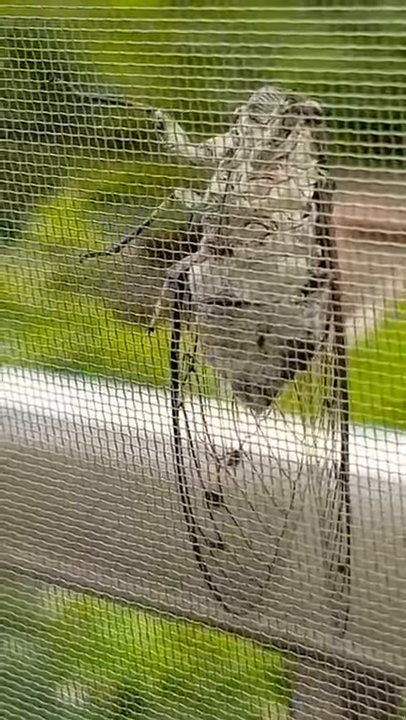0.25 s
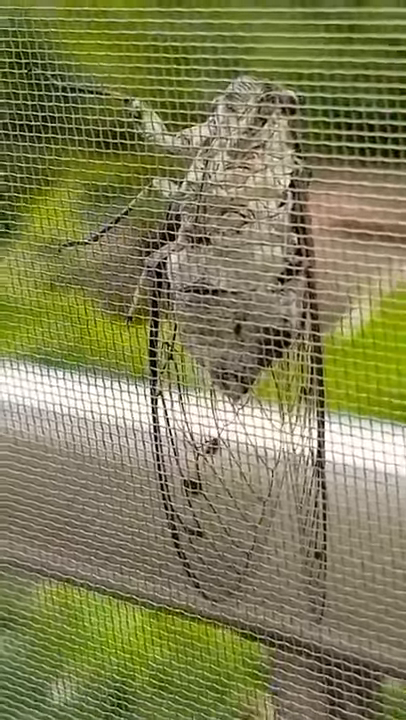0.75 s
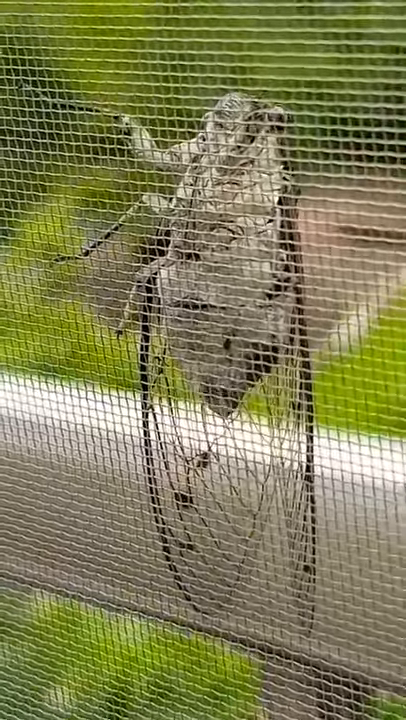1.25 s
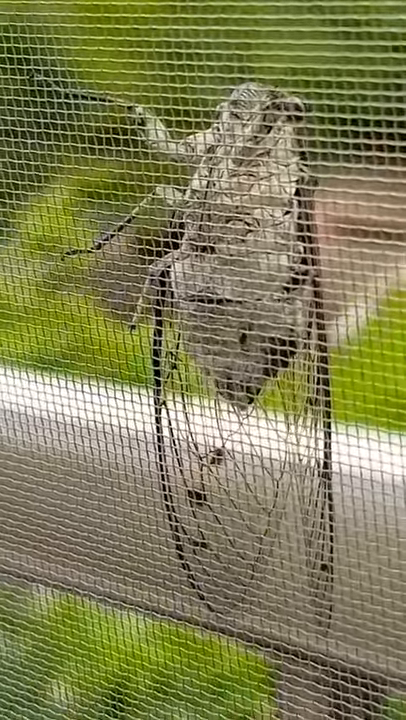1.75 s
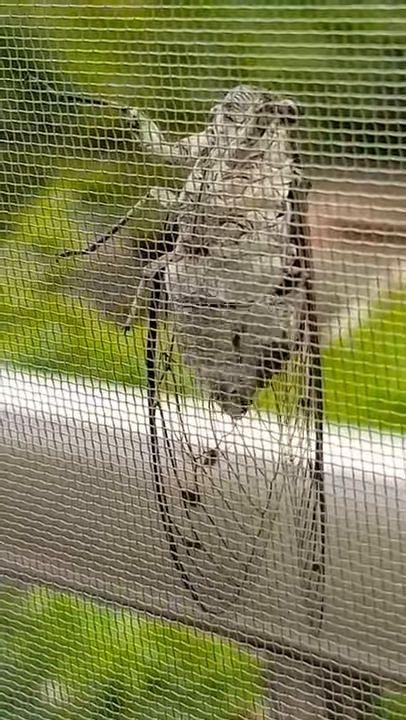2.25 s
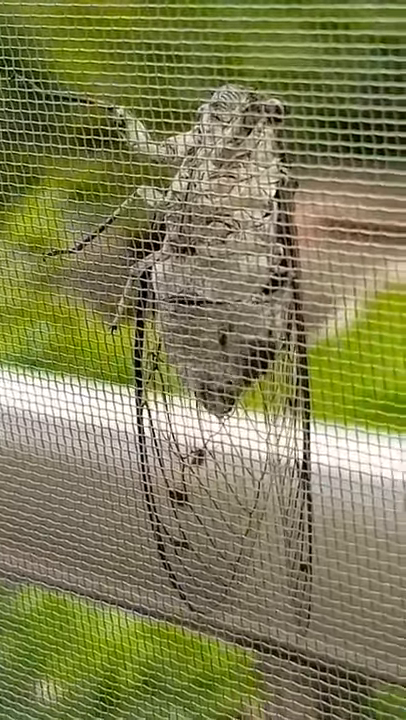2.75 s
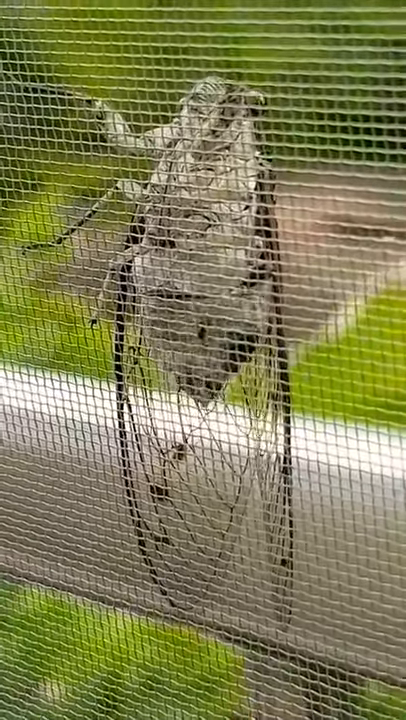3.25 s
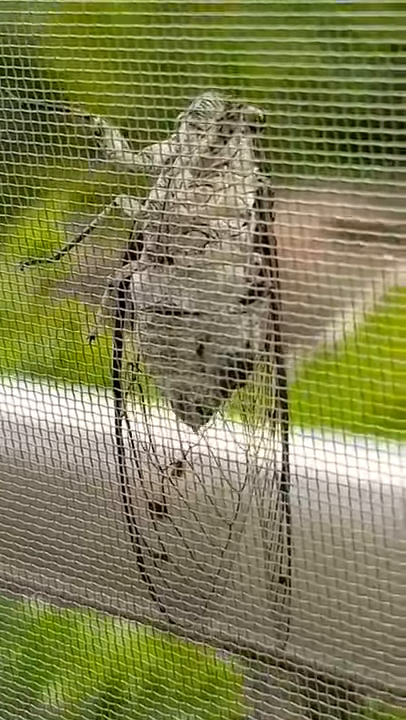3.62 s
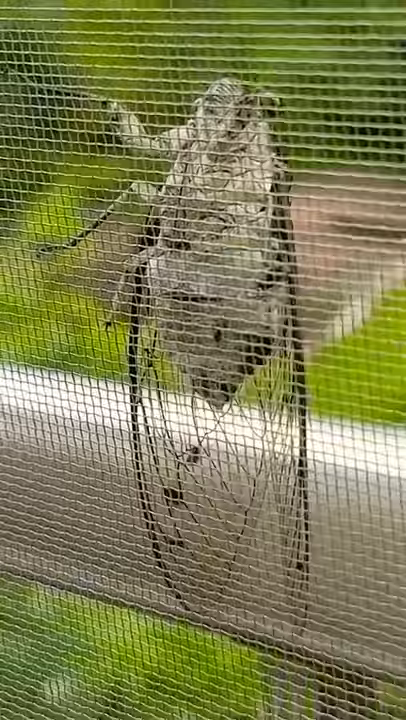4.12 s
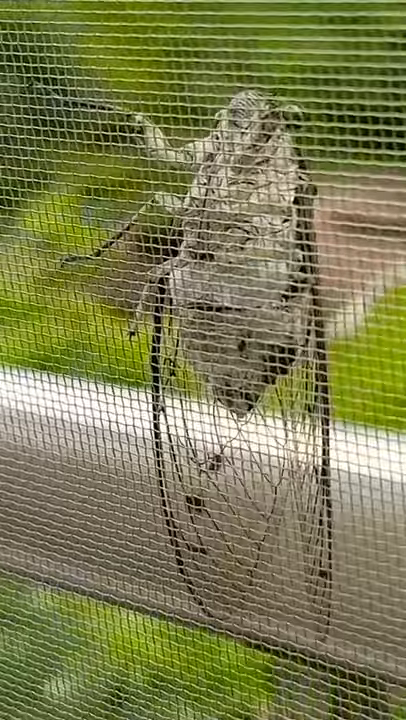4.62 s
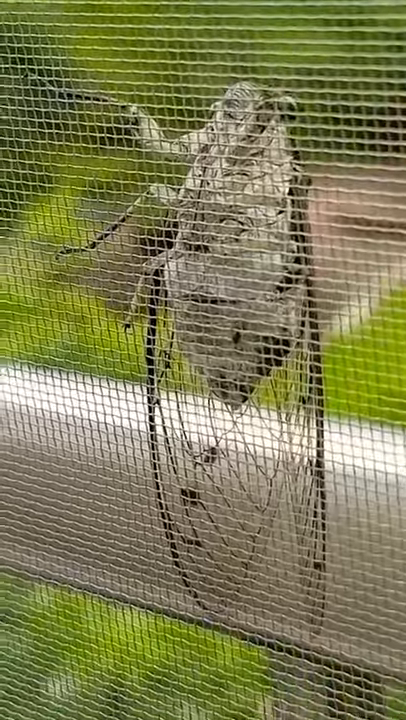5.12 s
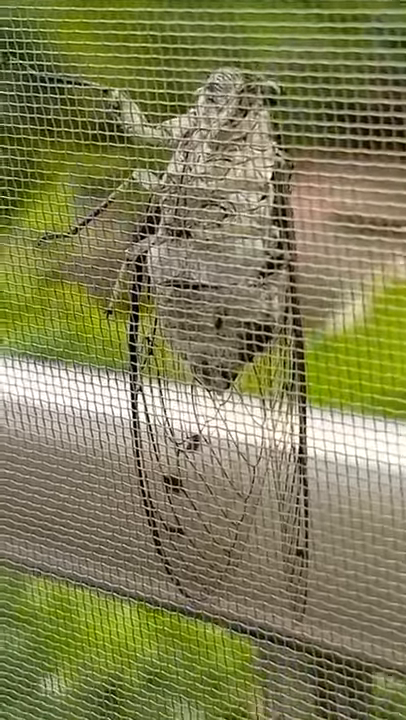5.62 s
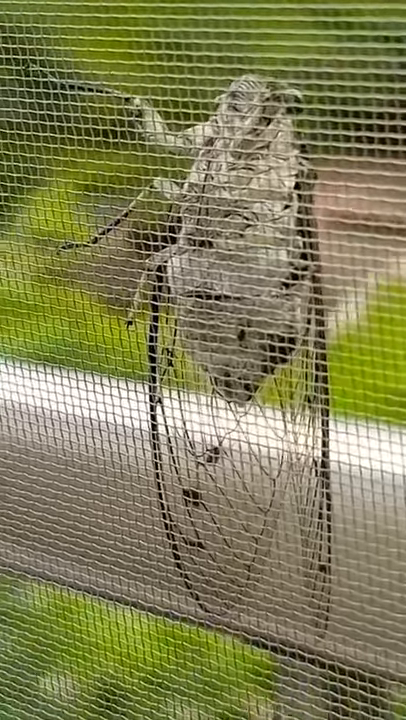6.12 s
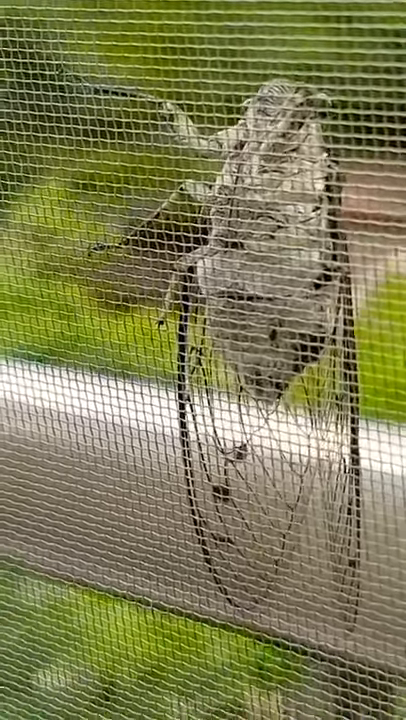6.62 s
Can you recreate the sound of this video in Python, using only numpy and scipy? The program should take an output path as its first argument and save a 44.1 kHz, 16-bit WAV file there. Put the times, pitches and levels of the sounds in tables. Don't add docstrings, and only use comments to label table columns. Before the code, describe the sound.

A single cicada on a window screen, a hand's width from a stereo microphone, buzzes loudly from the start. Its fast dry rattle sinks into a thinner, shriller hiss and leaps back to full ringing tone several times. After the last leap it holds a steadier buzz, slows to a rougher rattle and stops dead near five seconds, leaving low town rumble, faint hiss and a soft far motor hum.

```python
import sys
import numpy as np
from scipy import signal
from scipy.fft import rfft, irfft, next_fast_len
from scipy.io import wavfile
from scipy.ndimage import uniform_filter1d, map_coordinates

SR = 44100
rng = np.random.default_rng(int(sys.argv[2]) if len(sys.argv) > 2 else 0)


def to_wav(s):
    ch = np.atleast_2d(s).T
    pcm = np.round(np.clip(ch, -1, 1) * 32767)
    wavfile.write(sys.argv[1], SR, pcm.astype(np.int16))


def voltage_ratio(decibels):
    exponent = np.asarray(decibels, float) / 20
    return 10 ** exponent


N = 302967
TIME_S = np.arange(N) / SR
STOP_S = 5.0275


def evened(x):
    return x / np.sqrt(np.mean(x ** 2) + 1e-20)


def read(points, hz):
    f, value = np.transpose(points)
    return np.interp(np.log(hz + 1), np.log(f + 1), value)


def curves(rows):
    s, *columns = np.transpose(rows)
    return [np.interp(TIME_S, s, column) for column in columns]


def wander(per_s):
    return evened(np.interp(TIME_S * per_s, np.arange(200), rng.standard_normal(200)))


def resonate(x, hz, width_hz):
    turn = np.exp(2j * np.pi * np.cumsum(hz * np.ones(N)) / SR)
    r = np.exp(-np.pi * width_hz / SR)
    smooth = signal.lfilter([(1 - r) ** 2], [1, -2 * r, r * r], x / turn + 1e-18)
    return 2 * (turn * smooth).real


def resonances(drive, modes, scale):
    total = 0
    for k, (pitch, width_hz, level_db) in enumerate(modes):
        total = total + (-1) ** k * voltage_ratio(level_db) * resonate(drive, pitch * scale, width_hz)
    return total


def coloured(x, gain):
    size = next_fast_len(N)
    return irfft(rfft(x, size) * gain(np.fft.rfftfreq(size, 1 / SR)), size)[..., :N]


def posture():
    # sink_start_s, leap_up_s, accent_db, ring_db after the leap, shrill_db after the leap
    phrases = [
        (-.27, 0.08, 1.5, -33, -46),
        (1.144, 1.525, 1.5, -32, -39),
        (1.927, 2.285, 3, -30.5, -35),
        (2.596, 3.008, 3, -29, -32),
        (3.28, 3.682, 2, -28.5, -38),
    ]
    leap_length_s, accent_width_s = 0.054, .022
    ring_late_s, shrill_early_s = 0.0086, 0.012
    sink_s, leap_s, accent_db, ring_after_db, shrill_after_db = np.array(phrases).T[:, :, None]

    def sunk(late_s):
        sinking = np.clip((TIME_S - sink_s) / (leap_s - sink_s), 0, 1)
        leaping = np.clip(.5 - (TIME_S - leap_s - late_s) / leap_length_s, 0, 1)
        return (sinking * leaping).max(0)

    def accent(late_s):
        return (accent_db * np.exp(-.5 * ((TIME_S - leap_s - late_s) / accent_width_s) ** 2)).sum(0)

    def smooth(curve):
        return uniform_filter1d(curve, round(leap_length_s * SR))

    phrase = np.maximum(np.searchsorted(leap_s[:, 0], TIME_S) - 1, 0)
    since_s = np.maximum(TIME_S - leap_s[phrase, 0], 0)
    fresh = np.exp(-since_s / 0.43)
    sunk_early = sunk(-leap_length_s / 2)

    slump = since_s / 0.074 * np.exp(1 - since_s / 0.074)
    belly_db = -26 - 9.5 * sunk_early + accent(0) - 2 * slump
    ring_db = ring_after_db[phrase, 0] + 4.5 * fresh - 44 * sunk_early ** 2.5 + 0.57 * accent(ring_late_s)
    rattle_db = -32.5 + 3.5 * sunk(0) + 1.8 * accent(0)

    opened = np.maximum(1 - np.exp(-sunk(0) / 0.17), .5 * np.exp(-since_s / .04))
    shrill_closed_db = shrill_after_db[phrase, 0] - 13 * fresh
    shrill_db = shrill_closed_db * (1 - opened) - 22.5 * opened + 0.95 * accent(-shrill_early_s)

    ring_hz = 4330 + 560 * fresh * (TIME_S > leap_s[0]) - 900 * sunk(ring_late_s)
    shrill_sag = 1 - 0.06 * sunk(0)
    squeal = voltage_ratio(-33.5 - belly_db) * accent(0) / accent_db.max()
    over_belly_db = ring_db - belly_db, rattle_db - belly_db, shrill_db - belly_db
    return belly_db, *over_belly_db, smooth(ring_hz), smooth(shrill_sag), squeal, fresh


def snap_trains():
    # time_s, strokes_per_s
    strokes = [(0.05, 121), (0.4, 119), (0.85, 123.4), (1.15, 131), (1.3, 123.5), (1.6, 129.5), (2.05, 120),
               (2.43, 130), (2.77, 120.5), (3.08, 130), (3.35, 124.4), (3.57, 112.3), (4.15, 114),
               (4.45, 106.2), (4.72, 86), (4.95, 84)]
    # time_s, place (0-1)
    second_drum = [(0, 0.56), (3.4, 0.46), (3.8, 0.62), (4.4, 0.63), (4.7, 0.6), (5.03, 0.24)]
    jitter_s, slip_s, uneven_db = .00009, .00002, 1.2
    tired_s = np.maximum(TIME_S - 1.7, 0)
    lag_s = (2.87 - .09 * tired_s) / 1000

    strokes_hz, = curves(strokes)
    turns = np.cumsum(strokes_hz) / SR
    turns -= turns[round(STOP_S * SR) - 1]
    trains = np.zeros((4, N))
    for drum, place in enumerate((0, *curves(second_drum))):
        at = np.flatnonzero(np.diff(np.floor(turns - place)) > 0)
        at = at[at <= STOP_S * SR]
        shift, slip, inward, outward = rng.standard_normal((800, 4))[:len(at)].T
        buckle = at + np.round(shift * jitter_s * SR).astype(int)
        back = at + np.round((shift * jitter_s + lag_s[at] + slip * slip_s) * SR).astype(int)
        trains[drum, buckle] = voltage_ratio(uneven_db * inward)
        trains[drum + 2, back] = voltage_ratio(uneven_db * outward)
    return trains


def crackle(train, decay_s, steady):
    puff = signal.lfilter([1], [1, -np.exp(-1 / (decay_s * SR))], train)
    return (evened(puff) + steady) * rng.standard_normal((2, N))


def cicada():
    # belly_db, ring_db, rattle_db, shrill_db
    snaps = [
        (0, 0, -1, -2),
        (-1.5, -2, -2, -4),
        (-2, -1, -3, -4),
        (-2.5, -1, -1, 0),
    ]
    # pitch_hz, width_hz, level_db
    belly_modes = [(2252, 73, -7.5), (2492, 71, -7.5), (2784, 334, -7), (3055, 364, 2.5), (3540, 1196, -7)]
    # pitch (factor on the ring pitch), width_hz, level_db
    ring_modes = [(.86, 900, -2), (1.0, 520, 1), (1.09, 700, -6)]
    # pitch_hz, level_db
    rattle_colour = [(1000, -56), (1800, 4.5), (2050, -0.5), (2400, 8), (5000, 9.5), (5900, 2.5),
                     (7500, 2.5), (8800, 0.5), (10500, 6.5), (11400, 5), (12000, -8), (13000, 6),
                     (15500, 0)]
    # pitch_hz, width_hz, level_db
    shrill_modes = [(12800, 800, -1), (13700, 1000, 0.1), (14500, 700, -6), (15300, 500, -10)]
    belly_db, ring_db, rattle_db, shrill_db, ring_hz, shrill_sag, squeal, fresh = posture()
    low, mid, wide, top = voltage_ratio(np.transpose(snaps)) @ snap_trains()

    belly_drive = evened(low) + .35 * evened(crackle(low, .001, .8))
    belly = resonances(belly_drive, belly_modes, 1)

    ring_drive = evened(mid) + .45 * evened(crackle(mid, .001, .8))
    ring_hz = ring_hz * (1 + .02 * wander(22.0))
    skin = -resonances(ring_drive, ring_modes, ring_hz)
    rim = resonate(ring_drive, 5380, 680)
    ring = evened(skin) + voltage_ratio(-7 - 1.5 * fresh) * evened(rim)
    overtone = squeal * evened(resonate(ring_drive, 1.48 * ring_hz, 900))

    def rattle_gain(hz):
        return voltage_ratio(read(rattle_colour, hz)) * hz ** 2 / (hz ** 2 + 900 ** 2)

    rattle = coloured(crackle(wide, 0.00033, 1.0), rattle_gain)

    shrill_drive = .35 * evened(top) + evened(crackle(top, .0006, .8))
    shrill = resonances(shrill_drive, shrill_modes, shrill_sag)

    body = overtone + evened(belly)
    body += voltage_ratio(ring_db + 3.98 + wander(24.0)) * evened(ring)
    body += voltage_ratio(rattle_db + 1.75) * evened(rattle)
    body += voltage_ratio(shrill_db - 6.5) * evened(shrill)
    alive = np.exp(-np.maximum(TIME_S - STOP_S - .004, 0) / 0.0066)
    return voltage_ratio(belly_db) * alive * body


def ports(pair):
    # pitch_hz, level_db
    shadow = [(1500, 6.5), (2400, -9.5), (3200, -0.5), (4200, 2), (4950, -0.5), (5450, -10.5), (6200, 2.3),
              (8000, 0), (8700, -11), (9100, -20), (9600, -8.5), (11800, 2), (12600, -14.5), (14400, -7),
              (15100, 0)]
    # pitch_hz, likeness (0-1)
    near_same = [(1500, .6), (2300, .5), (2700, .95), (4400, .96), (5000, .7), (5600, .4), (6400, .5),
                 (7400, .93), (8400, .3), (12000, .25), (13500, .5)]
    # pitch_hz, phase (radians)
    trail = [(1200, .3), (1900, 2.4), (2500, .9), (3450, 2.2), (4300, 3.1), (5500, 4.1), (7000, 5.9),
             (7800, 6.5), (10000, 8.5), (13000, 11), (15500, 13)]
    main, unrelated = pair[0], np.roll(pair[1], round(.0011 * SR))

    def late(hz):
        return voltage_ratio(read(shadow, hz)) * np.exp(-1j * read(trail, hz))

    def same(hz):
        return np.clip(read(near_same, hz), 0, 1)

    right = coloured(main, lambda hz: late(hz) * same(hz))
    right += coloured(unrelated, lambda hz: late(hz) * np.sqrt(1 - same(hz) ** 2))
    sway_s = .000014 * wander(22.0)
    right = map_coordinates(right, [np.arange(N) + sway_s * SR], order=3, mode="nearest")
    return np.array([main, right])


def nook(x):
    t = np.arange(4000) / SR
    signs = rng.choice([-1., 1.], (2, 4000))
    sparse = rng.random((2, 4000)) < .05
    taps = signs * sparse * voltage_ratio(-60 * t / .13) * (t > .0015)
    return signal.fftconvolve(x, taps / np.linalg.norm(taps[0]), axes=1)[:, :N]


def town_wash():
    # pitch_hz, level_db per Hz
    hum = [(15, -53), (25, -47), (48, 4.5), (129, -0.5), (183, 2.5), (227, -7), (598, -8.5), (666, -15.5),
           (895, -10.5), (1170, -12), (2300, -26.5), (3530, -21.5), (4750, -23), (5430, -34.5),
           (15500, -37.5)]
    # pitch_hz, likeness (-1 to 1)
    hum_same = [(60, 1), (150, 1), (380, 0.87), (950, 0.7), (2380, -0.12), (5980, -0.036), (15000, 0.11)]
    frames = N // 256 + 5
    hz = np.fft.rfftfreq(1024, 1 / SR)[:, None]
    a, b, c, d, patches = rng.standard_normal((frames, 513, 5)).T
    patches = evened(uniform_filter1d(uniform_filter1d(patches, 10, 0), 20, 1))
    same = np.clip(read(hum_same, hz), -1, np.sqrt(15 / 16))
    left = a + 1j * b
    right = same * left + np.sqrt(1 - same ** 2) * (c + 1j * d)
    z = np.array([voltage_ratio(-9.0) * left, voltage_ratio(-10.0) * right])
    z *= 1 / (1 + (38 / (hz + 1)) ** 4)
    low = 1 / (1 + (hz / 450) ** 2)
    swell_db = .5 * np.resize(wander(1.5)[::256], frames)
    z *= voltage_ratio(read(hum, hz) + 1.5 * patches + low * swell_db)
    return voltage_ratio(-42) * evened(signal.istft(z, nperseg=1024, noverlap=768)[1][:, :N])


def far_motor():
    motor_hz = 177 + 2.5 * wander(2.5)
    passing = np.exp(-.5 * ((TIME_S - 2.85) / .45) ** 2)
    motor_db = -57 + 6 * passing + 2 * wander(2.45)
    drone = 0
    for multiple, level_db in ((1, -1.1), (1.5, -2.5), (2, -6.5)):
        tone = resonate(rng.standard_normal(N), multiple * motor_hz, 17.0)
        drone = drone + voltage_ratio(level_db) * evened(tone)
    return voltage_ratio(motor_db) * drone


def scene():
    near = ports(cicada())
    return near + voltage_ratio(-16) * nook(near) + town_wash() + far_motor()


def band_limit(x):
    return signal.sosfilt(signal.butter(12, 16860, fs=SR, output="sos"), x)


def record(dry):
    squeezed = .8 * np.tanh(dry / .8)
    gate = np.clip((6.826 - TIME_S) / .002, 0, 1)
    gate *= np.clip(0.9 + TIME_S / .04, 0, 1)
    treble_limit = signal.firwin(511, 15500, window=("kaiser", 9), fs=SR)
    limited = signal.oaconvolve(squeezed * gate, treble_limit[None], "same")
    return band_limit(limited)


dry = scene()
out = record(dry)
to_wav(out)
```